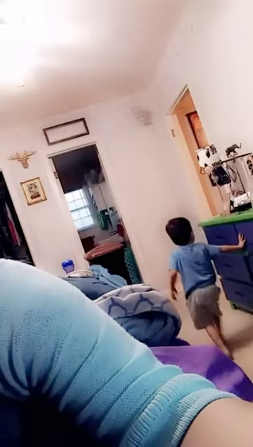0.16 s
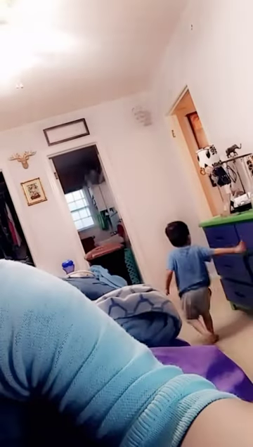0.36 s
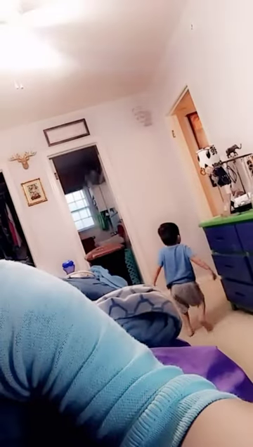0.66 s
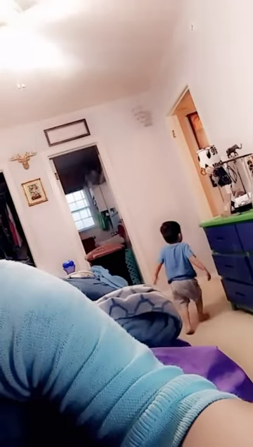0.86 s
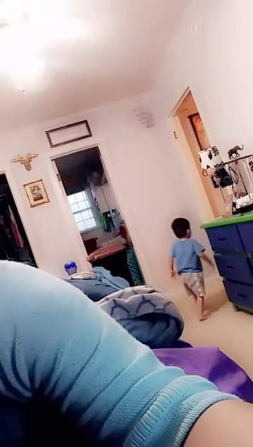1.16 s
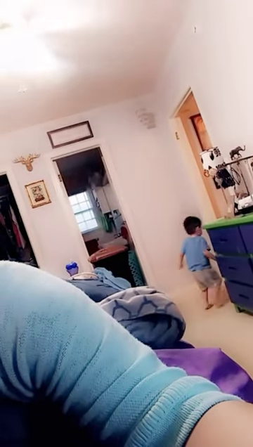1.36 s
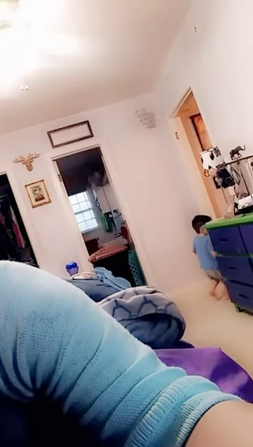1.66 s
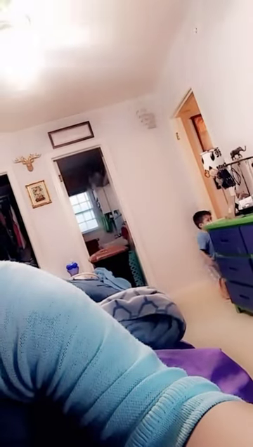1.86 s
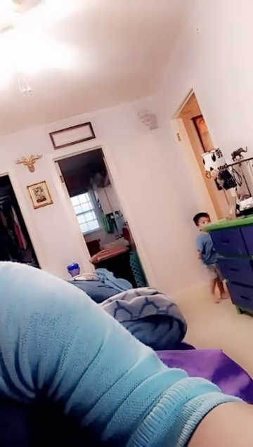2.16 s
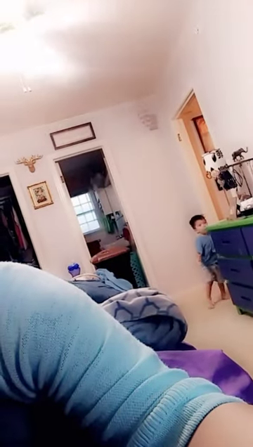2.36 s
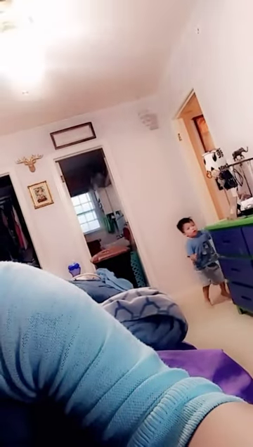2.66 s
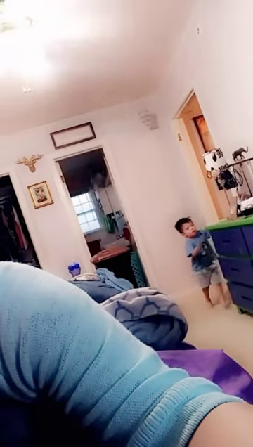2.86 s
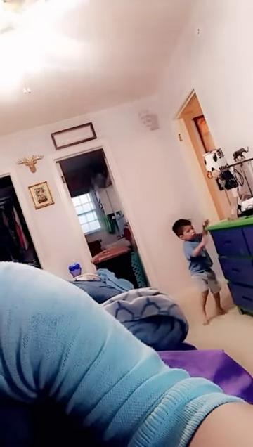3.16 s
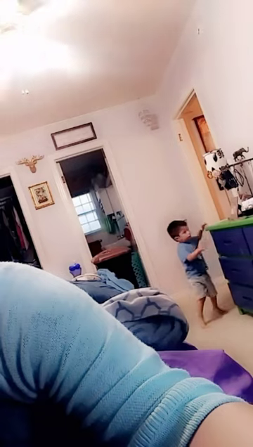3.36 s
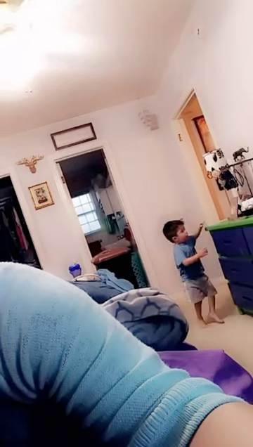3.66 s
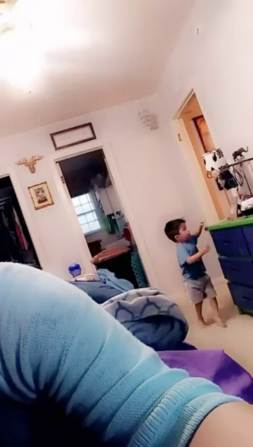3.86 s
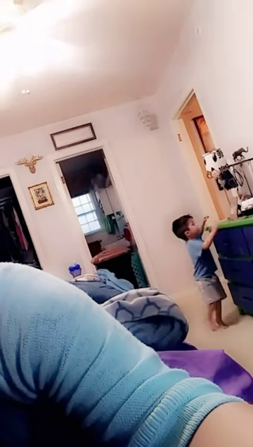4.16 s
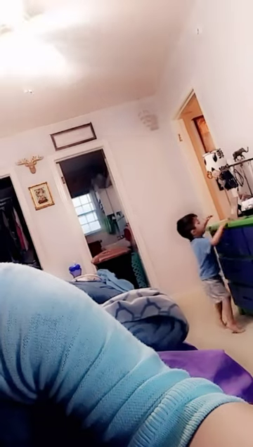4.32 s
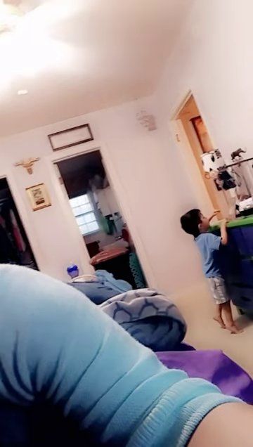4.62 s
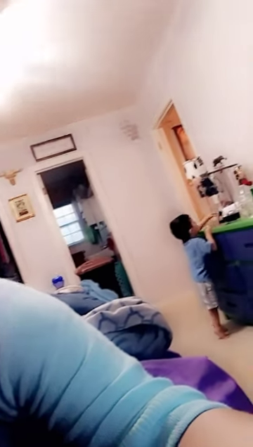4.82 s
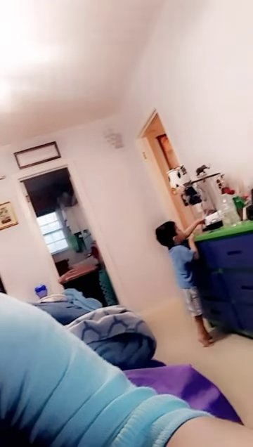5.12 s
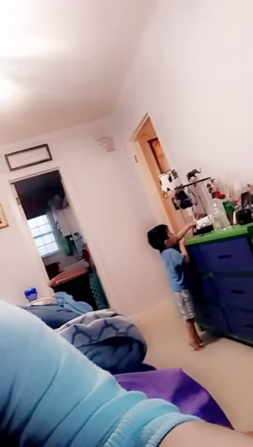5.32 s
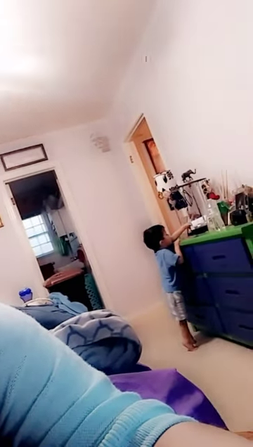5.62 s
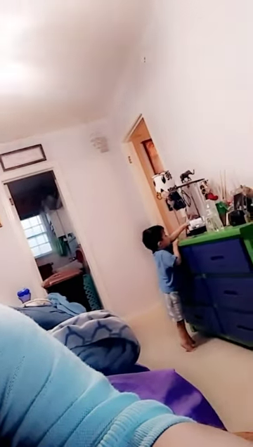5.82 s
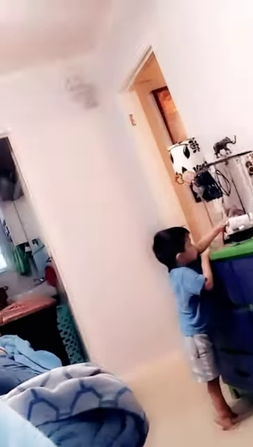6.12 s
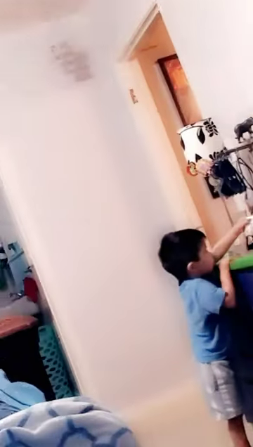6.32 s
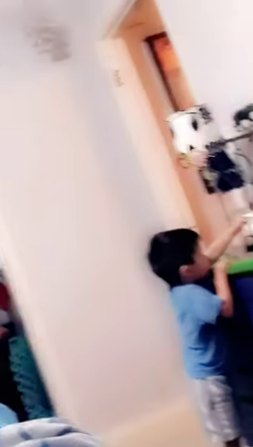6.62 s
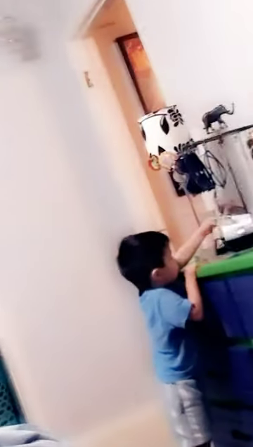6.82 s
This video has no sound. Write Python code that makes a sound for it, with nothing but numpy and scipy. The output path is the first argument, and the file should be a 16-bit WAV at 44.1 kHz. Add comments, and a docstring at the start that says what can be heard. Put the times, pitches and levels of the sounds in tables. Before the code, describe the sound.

A fan hums quietly and steadily in a bedroom, its low tone wavering slightly under a soft, muffled burble of air with very faint treble. A hand-held phone picks up its own handling up close. From 0 to 1.3 s there are tiny ticks, a few light fingernail taps and faint cloth brushes. A weak pop comes near 1.8 s and a small tap at 2.4; between 2.7 and 3.9 s several dull hollow bumps sound, with one slight brush. At about 4.45 s cloth rustles roughly against the case with crowded clicks, peaking in a loud sharp knock at 4.8 and fading by 5.4. Sparse ticks and a bump follow, with firmer clicks around 6.1 to 6.2. From 6.3 s a thicker rustle builds with bumps, low thuds and clicks, strong near 6.7 and surging into a loud drag just before the end at 7 s.

```python
"""A fan hums softly and its air rush burbles in a quiet bedroom, heard by a hand-held phone.
Fingers tick and tap on the phone case; cloth brushes it briefly three times, then the sleeve and
blanket rustle and bump against it in two longer, stronger passages, with low thuds of the hand.
The hum is wavering sines, air and cloth are shaped noise, ticks and taps are filtered snaps,
and bumps and thuds are decaying sines."""
import sys
import numpy as np
from scipy import signal
from scipy.fft import rfft, irfft
from scipy.io import wavfile
from scipy.ndimage import uniform_filter1d

SR = 44100
rng = np.random.default_rng(int(sys.argv[2]) if len(sys.argv) > 2 else 0)


def put_to_file(sound):
    """Save the sound as 16-bit audio at rate SR, in the file named by the first command-line argument."""
    columns = np.atleast_2d(sound).T  # one column per channel
    safe = np.clip(columns, -1, 1)
    whole_steps = np.round(safe * 32767)
    wavfile.write(sys.argv[1], SR, whole_steps.astype(np.int16))


N = 307818


def gain_of(db):
    """Decibel law: an amplitude ratio is ten to the power dB / 20."""
    return 10 ** (np.asarray(db) / 20)


def evened(x):
    """Power normalisation: scales to rms 1."""
    return x / np.sqrt(np.mean(abs(x) ** 2) + 1e-20)


def add(mix, s, sound):
    """Superposition: adds a sound to the mix at time s, cut off at the end of the mix."""
    part = mix[round(s * SR):][:len(sound)]
    part += sound[:len(part)]


def read(points, hz):
    """Spectral envelope: interpolates dB on a log-frequency axis."""
    point_hz, db = np.transpose(points)
    return np.interp(np.log(hz + 1), np.log(point_hz + 1), db)


def noise(shape, size, contrast, patchy_db, flicker_db, cap=6.0):
    """Noise of rms 1 whose short-time power fluctuates, filtered to a spectral shape."""
    overlap = size - size // 4
    cells = evened(signal.stft(rng.standard_normal(N), nperseg=size, noverlap=overlap)[2])
    # patches drift over neighbouring bins and frames
    patches = rng.standard_normal(cells.shape[::-1]).T
    patches = uniform_filter1d(patches, size=5, axis=0)
    patches = evened(uniform_filter1d(patches, size=12, axis=1))
    # flicker is shared by all bins of a frame
    flicker = evened(uniform_filter1d(rng.standard_normal(cells.shape[1]), size=3))
    # contrast stretches loud cells into blobs; cap, in rms units, limits the stretch
    cells = cells * np.minimum(abs(cells), cap) ** contrast
    cells = cells * gain_of(patchy_db * patches + flicker_db * flicker)
    uneven = signal.istft(cells, nperseg=size, noverlap=overlap)[1][:N]
    envelope = gain_of(read(shape, np.fft.rfftfreq(N, 1 / SR)))
    return evened(irfft(rfft(uneven) * envelope, N))


def hum():
    """Tonal motor noise: steady sines, some with slow random amplitude modulation."""
    # fan motor tones: tone_hz, rms_level_db, waver_db
    tones = [(58.7, -78.5, 0), (113.7, -54.5, 1), (137.8, -65, 4), (173, -63.5, 3)]
    t = np.arange(N) / SR
    out = np.zeros(N)
    for hz, db, waver_db in tones:
        waver_hz = np.geomspace(.4, 12, num=12)
        waver = evened(sum(np.sin(2 * np.pi * (f * t + rng.random())) for f in waver_hz))
        tone = np.sqrt(2) * np.sin(2 * np.pi * (hz * t + rng.random()))  # rms 1
        out += gain_of(db + waver_db * waver) * tone
    return out


def rush():
    """Broadband flow noise: a body burbling in short blobs under a faint twinkling treble."""
    # spectrum of the body of the air rush: frequency_hz, density_db (relative, per Hz)
    body_shape = [(20, -39), (85, -32.5), (120, -23.5), (180, -16), (215, -24.5), (260, -15), (310, -18),
                  (400, -11.5), (470, 0.5), (560, -5.5), (690, -4), (900, -10), (1040, -7.5), (1170, -15),
                  (1400, -8.5), (1550, -11), (2050, -40.5), (4000, -120)]
    # spectrum of its treble: frequency_hz, density_db (relative, per Hz)
    treble_shape = [(1500, -48), (1900, -52), (2100, -4), (2350, 2.5), (3050, -1), (3300, -11.5),
                    (3450, -4), (3700, -15), (4300, -11), (4850, -7), (5600, -14.5), (6700, -24.5),
                    (8600, -14.5), (9900, -17.5), (11500, -24)]
    body_db, treble_db = -36.5, -57  # rms levels
    body = noise(body_shape, size=512, contrast=1.96, patchy_db=1.5, flicker_db=1.0, cap=1.295)
    treble = noise(treble_shape, size=1024, contrast=1.9, patchy_db=2.3, flicker_db=1.33, cap=2.0)
    return gain_of(body_db) * body + gain_of(treble_db) * treble


def rustles():
    """Stick-slip friction: grainy fibre hiss and a lower drag, each under its own stroke envelope."""
    # one table a rustle, hiss of the cloth and drag on the case: time_s, hiss_db, drag_db
    strokes = [
        [(0, -66, -52), (.06, -52.5, -44), (.16, -70, -69)],
        [(0.99, -62, -60), (1.09, -58, -49), (1.15, -56, -49), (1.26, -73, -45)],
        [(2.72, -74, -47), (2.8, -56.5, -53), (2.95, -72, -58)],
        [(4.44, -70, -43), (4.5, -55, -49), (4.56, -35, -40), (4.585, -47, -38), (4.625, -40.5, -43),
         (4.655, -47, -58), (4.7, -39, -55), (4.765, -38.5, -56), (4.785, -27, -27), (4.81, -33, -35),
         (4.85, -41.5, -33), (4.89, -35, -50), (4.94, -51, -39.5), (4.99, -42, -36), (5.035, -59, -47),
         (5.07, -38, -28.5), (5.105, -54, -52), (5.14, -46.5, -44), (5.21, -46.5, -50), (5.24, -50, -49),
         (5.29, -45.5, -35), (5.32, -56, -47), (5.38, -59, -35)],
        [(6.31, -73, -58), (6.35, -46, -55), (6.42, -49, -43.5), (6.5, -45.5, -38.5), (6.548, -40, -36),
         (6.59, -35, -24.5), (6.602, -33, -24.5), (6.628, -30.5, -24.5), (6.675, -27.5, -17.5),
         (6.692, -34, -19.5), (6.724, -37, -33), (6.754, -40.5, -38), (6.785, -36, -32), (6.824, -35, -35),
         (6.836, -31, -34), (6.866, -36, -25.5), (6.878, -30.5, -22), (6.9, -35, -31.5), (6.916, -30, -20.5),
         (6.936, -42, -28.5), (6.952, -32, -25), (6.964, -46, -36.5), (6.99, -30, 4)],
    ]
    # spectrum of the cloth fibres: frequency_hz, density_db (relative, per Hz)
    hiss_shape = [(880, -34.5), (1500, -8), (2150, -8), (4290, -16.5), (4650, -16.5), (5700, -18),
                  (10500, -17.5), (13600, -31), (22000, -120)]
    # spectrum of the case dragged on cloth: frequency_hz, density_db (relative, per Hz)
    drag_shape = [(35, -73), (60, -60), (108, -39), (145, -27), (394, -6), (676, -6.5), (851, -2.5),
                  (3000, -23), (3900, -69), (6600, -120)]
    hiss = noise(hiss_shape, size=256, contrast=0.75, patchy_db=4.0, flicker_db=2.5, cap=1.8)
    # fibres slip in short crackles, 150 a second on average
    snaps = gain_of(1.5 * np.minimum(rng.exponential(1, N), 4)) * (rng.random(N) < 150 / SR)
    crackle = np.exp(-abs(np.arange(-200, 201)) / 360.0)
    grain = signal.oaconvolve(snaps, crackle, "same")
    hiss = evened(hiss * (1 + 1.1 * evened(grain)))
    drag = noise(drag_shape, size=512, contrast=1.0, patchy_db=3.0, flicker_db=3.5)
    out = np.zeros(N)
    for rows in strokes:
        s, hiss_db, drag_db = np.transpose(rows)
        at = np.arange(round(s[0] * SR), round(s[-1] * SR))
        stroke = gain_of(np.interp(at / SR, s, hiss_db)) * hiss[at % N]
        stroke += gain_of(np.interp(at / SR, s, drag_db)) * drag[at % N]
        add(out, s[0], stroke * signal.windows.tukey(len(at), .06))
    return out


def contacts(rows, modes=()):
    """Impulse excitation: a snap in a brief scratch, coloured by chance or by resonant modes."""
    out = np.zeros(N)
    t, hz = np.arange(-1024, 1024) / SR, np.fft.rfftfreq(2048, 1 / SR)
    octaves = np.log2((hz + 1) / 1000)  # over 1 kHz
    small = 1j * hz / (700 + 1j * hz)  # a small contact radiates little bass
    twin_s, twin_db = 512 / SR, -20.0  # a faint twin sounds just before and just after
    twins = 1 + 2 * gain_of(twin_db) * np.cos(2 * np.pi * hz * twin_s)
    ring = 0
    for k, (mode_hz, width_hz, db) in enumerate(modes):
        ring = ring + (-1) ** k * gain_of(db) / (1 + 2j * (hz - mode_hz) / width_hz) ** 2
    grits = rng.standard_normal((len(rows), len(t)))
    # each spot has its own colour
    lumps = evened(uniform_filter1d(rng.standard_normal((len(rows), len(hz))), size=24))
    for (s, peak_db, pitch, fall_db, ms), grit, lump in zip(rows, grits, lumps):
        scratch = grit * np.exp(-abs(t) * 1000 / ms)
        snap = (t == 0) + 0.015 * ms ** 0.9 * scratch  # long scratches bury the snap
        # the colour drops faster the further from the pitch
        drop_db = np.maximum(fall_db, 0) * abs(octaves - pitch) ** 1.32
        colour = -1j * abs(small) ** 2 * gain_of(-drop_db)
        body = ring if len(modes) else gain_of(1.8 * lump)
        tick = irfft(rfft(snap) * colour * body * twins)
        add(out, s + t[0], gain_of(peak_db) * tick / abs(tick).max())
    return out


def ticks():
    """Contact noise: fingers tick on the case, each spot with a random spectral colour."""
    # ticks: time_s, peak_db, pitch_octaves (over 1 kHz), fall_db (one octave from pitch), scratch_ms
    return contacts([(0.052, -45, 2.2, 150, 9.5), (0.509, -39, 3, 8, 2.3), (1.068, -34, 1.3, 7, 6.5),
                     (4.5086, -29, 0.73, 3.5, 11), (4.521, -28, 1.5, 15, 5.4), (4.555, -19, 3.5, 14, 8),
                     (4.564, -24.5, 1.5, 15, 9.4), (4.5996, -27, 1.4, 8, 21), (4.634, -14.5, 0.81, 14, 4.3),
                     (4.6512, -15.5, 2, 6, 5.5), (4.6572, -21, 2.8, 9, 1.5), (4.6616, -8.5, 1.66, 7.5, 4.9),
                     (4.681, -10.5, 1.9, -2, 4.8), (4.714, -23, 2.2, -4, 4.2), (4.743, -8, 0.8, 2, 4.7),
                     (4.746, -18, 1.5, 3, 1.5), (4.7796, -13.5, 1.5, 17, 7.6),
                     (4.7801, 3.5, 0.85, 1.5, 1.1), (4.7841, -13.5, 0.8, 23, 1.5),
                     (4.8009, -18, 1.1, 6, 8.3), (4.8229, -17, 1.4, 22, 1.5), (4.823, -2, 3.35, 19, 2.6),
                     (4.8827, -19, 3.0, 8, 4.9), (4.9006, -19.5, 0.41, 22, 3.8), (4.901, -29, 4.2, 15, 2.2),
                     (4.922, -15, 2.8, 12, 5.5), (4.9511, -21, 0.66, 9, 7), (4.957, -26, 3.26, 18, 7),
                     (4.984, -30, 2.9, 14, 5), (4.992, -33, 1.2, 14, 3.3), (5.018, -23.5, 0.86, 5.5, 10),
                     (5.07, -22, 1.7, 7, 3.3), (5.0795, -32, 4.4, 18, 1.5), (5.091, -12.5, 3.7, 1, 3.4),
                     (5.119, -24.5, 1.4, 14, 4.4), (5.159, -36, 2.5, 6, 3), (5.177, -33, 2, 4, 3.5),
                     (5.209, -37, 3, 4, 6), (5.2665, -29, 3.6, 4, 8), (5.2902, -28.5, 1.82, 29, 6.6),
                     (5.4317, -12.5, 0.44, 19.5, 4.4), (5.449, -19.5, 1.57, 19, 3.1),
                     (5.711, -34, 1.9, 4.5, 6.2), (5.757, -21, 3.39, 24, 3.5), (5.8768, -28, 3.08, 22, 3.8),
                     (6.1025, -11.5, 0.48, 12.5, 3.1), (6.191, -9.5, 0.28, 9.5, 3.3),
                     (6.3118, -16, 0.64, 13.5, 3.5), (6.336, -31, 2.85, 500, 4.6),
                     (6.3385, -25.5, 3.1, 500, 5.2), (6.34, -22, 1.8, 2.5, 7.1),
                     (6.6385, -22, 0.9, 12, 3.3), (6.665, -23, 0.45, 18, 2.2), (6.717, -28, 1.6, 10, 3),
                     (6.781, -26, 0.6, 15, 4.9), (6.802, -10.5, 3.7, 14, 2.2),
                     (6.835, -14.5, 0.54, 25, 4.2), (6.8374, -7, 3, 13, 4.6), (6.894, -25, 2.6, 12, 6.4),
                     (6.9095, -23, 2.2, 12, 2), (6.921, -6, 2.7, 19, 3.5), (6.9508, -14, 0.3, 7, 8.5),
                     (6.9537, -12, 0.35, 6, 2.5)])


def bumps():
    """Damped resonance: a soft push rings the case for a few cycles, with a lower thump under it."""
    # dull pops and bumps: start_s, level_db (before rise and decay), ring_hz
    pushes = [(0.207, -21.5, 557), (1.794, -26, 516), (2.803, -18.5, 800), (2.903, -14, 554),
              (2.982, -23, 620), (3.073, -22, 663), (3.12, -20, 458), (3.316, -37, 595),
              (3.401, -14.5, 520), (3.534, -16, 716), (3.88, -16, 780), (4.514, -19.5, 385),
              (4.7887, -3.5, 540), (5.513, -12.5, 510), (6.1894, -15, 880), (6.312, -23, 725),
              (6.41, -16, 516), (6.424, -14, 780), (6.464, -34, 527), (6.583, -10, 835), (6.622, -11, 395),
              (6.688, -2, 587), (6.764, -26, 1000), (6.875, -14, 660), (6.949, -10, 820)]
    t60_s, rise_s = 0.015, 0.0011
    out, t = np.zeros(N), np.arange(4000) / SR
    for s, level_db, hz in pushes:
        rise = 1 - np.exp(-t / rise_s)
        ring = np.sin(2 * np.pi * hz * t) + 0.083 * np.sin(2 * np.pi * 0.69 * hz * t)
        add(out, s, gain_of(level_db - 60 * t / t60_s) * rise * ring)
    # the light case moves no deep bass
    return signal.sosfilt(signal.butter(2, 170, "high", fs=SR, output="sos"), out)


def taps():
    """Modal excitation: fingernail taps ring the resonances of the case."""
    # taps: time_s, peak_db, pitch_octaves (over 1 kHz), fall_db (one octave from pitch), scratch_ms
    nail_taps = [(0.2403, -26.5, 2.27, 16, 3.4), (0.75, -39, 2.05, 12, 4.7), (0.8228, -30, 1.8, 25, 1.4),
                 (0.8282, -36, 2, 25, 1.4), (0.8333, -26, 0.94, 11, 4), (1.1257, -26, 0.96, 16, 2.2),
                 (1.1485, -31, 1.2, 6, 2.2), (1.1513, -23, 0.83, 8.5, 2.6), (2.4302, -18.5, 1.86, 20, 2.8)]
    # modes of the case: mode_hz, width_hz, level_db (relative)
    case_modes = [(2700, 600, -7), (3450, 400, 0), (4480, 400, -8), (5200, 600, 0), (6100, 600, -14),
                  (7800, 600, -6), (9900, 1000, -3)]
    return contacts(nail_taps, case_modes)


def thuds():
    """Damped oscillation with falling pitch: each thud starts high and its pitch sags lower."""
    # low thuds of the hand: start_s, level_db (before rise and decay), starting_hz
    pushes = [(4.789, -22, 516), (4.944, -34, 400), (4.985, -37, 380), (5.054, -24, 520),
              (5.157, -30.5, 320), (6.273, -39, 328), (6.322, -36, 330), (6.403, -26.5, 372),
              (6.551, -35, 264), (6.661, -32, 330), (6.681, -27, 326), (6.714, -35, 220), (6.773, -34, 407),
              (6.793, -29, 327), (6.819, -37, 196), (6.835, -26.5, 430), (6.912, -29.5, 150),
              (6.951, -29.5, 260)]
    t60_s, rise_s, end_hz, sag_s = 0.058, 0.00069, 120, 0.0065
    out, t = np.zeros(N), np.arange(4000) / SR
    for s, level_db, hz in pushes:
        turns = np.cumsum(end_hz + (hz - end_hz) * np.exp(-t / sag_s)) / SR
        rise = 1 - np.exp(-t / rise_s)
        add(out, s, gain_of(level_db - 60 * t / t60_s) * rise * np.sin(2 * np.pi * turns))
    return signal.sosfilt(signal.butter(4, 100, "high", fs=SR, output="sos"), out)


def scene():
    """Superposition: the pressures of all sources add at one microphone."""
    return (hum() + rush() + rustles() + ticks() + bumps() + taps() + thuds())[None]


def record(dry):
    """Linear filtering: the microphone rolls off at both ends, then a low-pass limits the band."""
    # microphone response: frequency_hz, gain_db
    response = [(20, -1), (90, 0.5), (10400, -3.5), (11200, -10), (11800, -15), (12300, -34)]
    edge_hz = 12295
    dull = irfft(rfft(dry) * gain_of(read(response, np.fft.rfftfreq(N, 1 / SR))), N)
    band_limit = signal.firwin(511, edge_hz, window=("kaiser", 9), fs=SR)
    return signal.oaconvolve(dull, band_limit[None], "same")


dry = scene()
out = record(dry)
put_to_file(out)
```